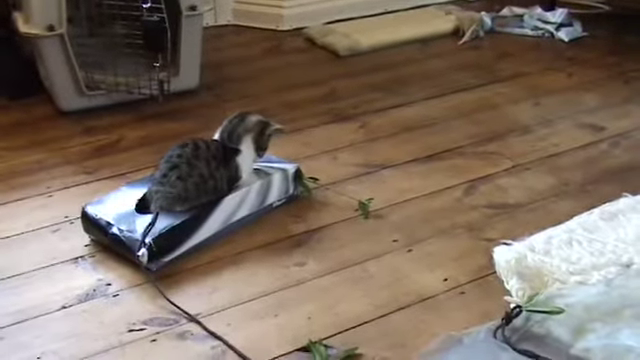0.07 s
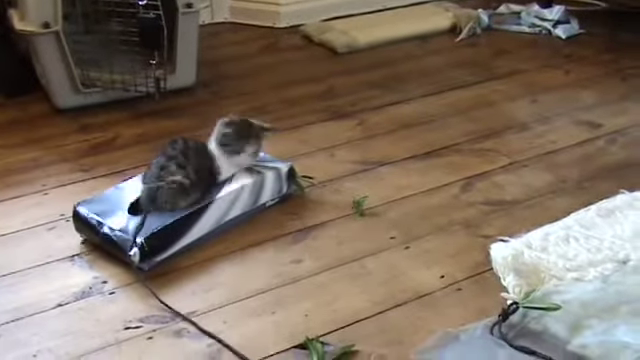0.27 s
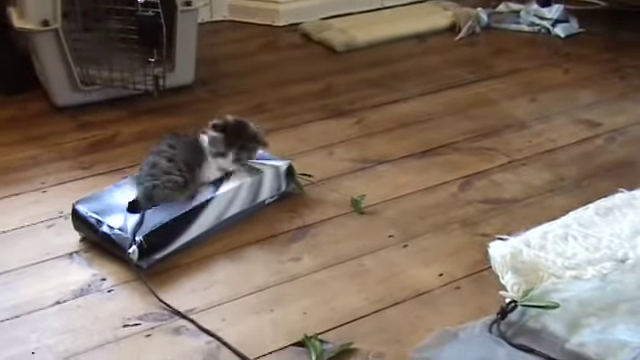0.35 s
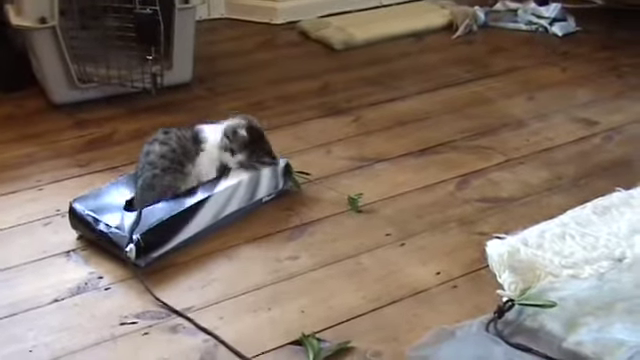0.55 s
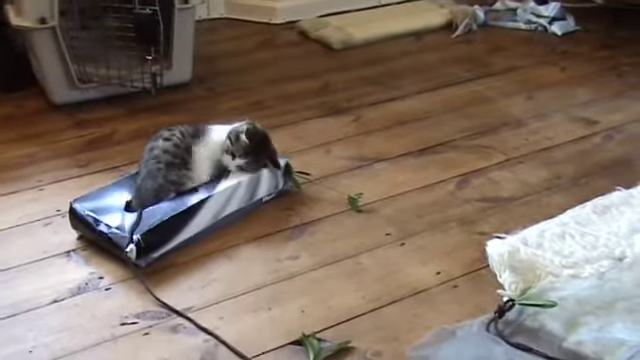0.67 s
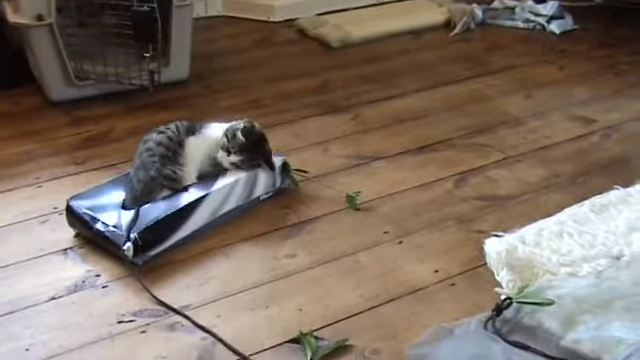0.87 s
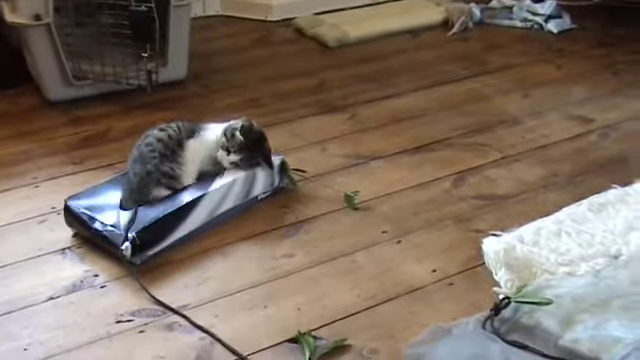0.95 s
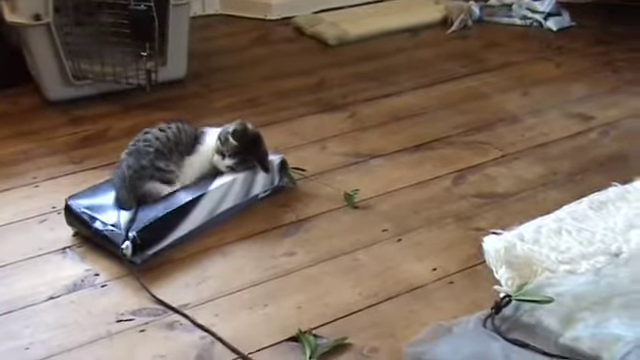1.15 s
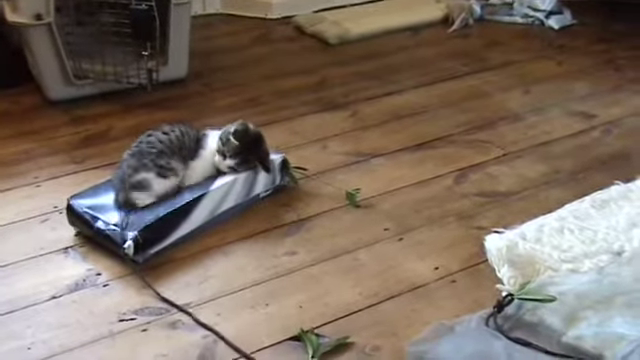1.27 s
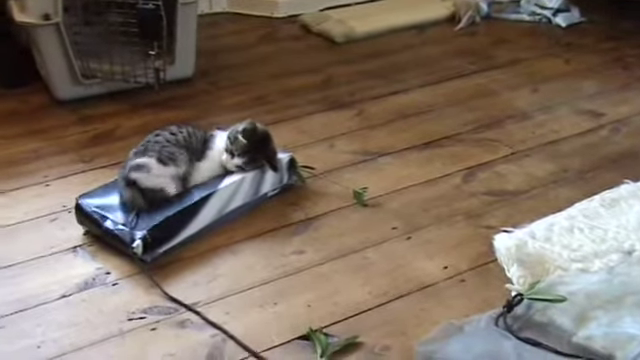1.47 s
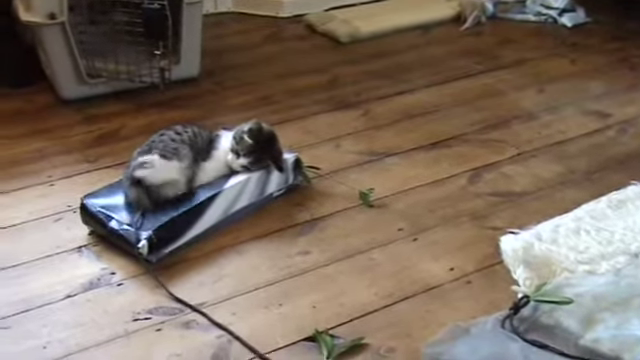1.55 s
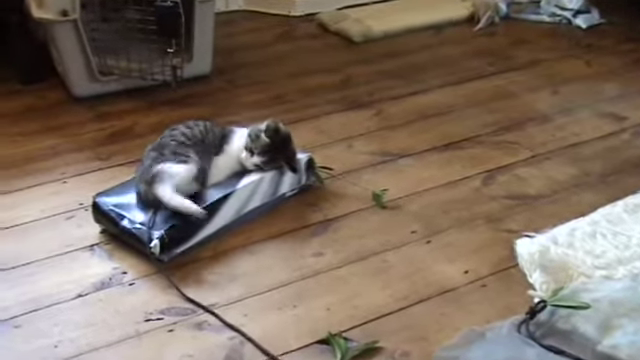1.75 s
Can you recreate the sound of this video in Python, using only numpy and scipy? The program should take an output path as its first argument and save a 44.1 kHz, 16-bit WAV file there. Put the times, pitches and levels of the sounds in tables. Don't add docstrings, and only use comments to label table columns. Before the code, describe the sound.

A hollow paper-wrapped box knocks on a wooden floor under a kitten. Faint rubbing from 0.1 seconds leads to a loud low thump cluster at 0.24-0.3 with paper crackle, then knocks at 0.33 and 0.44. A firm lid knock follows at 0.84, a bright sharp snap at 0.93, smaller taps at 1.1 and 1.28, near quiet, then faint rustling around 1.7. Bare room echo, soft hiss.

```python
import sys
import numpy as np
from scipy import signal
from scipy.io import wavfile

SR = 44100
rng = np.random.default_rng(int(sys.argv[2]) if len(sys.argv) > 2 else 0)


def elevation(decibels):
    levels = np.asarray(decibels, float)
    return 10 ** (levels / 20)


def generate_wav(signal):
    frames = np.transpose(np.atleast_2d(signal))
    scaled = np.clip(frames, -1, 1) * 32767
    pcm = np.round(scaled).astype(np.int16)
    wavfile.write(sys.argv[1], SR, pcm)


N = 79380


def evened(x):
    return x / np.sqrt(np.mean(x ** 2) + 1e-20)


def read(points, hz):
    f, value = np.transpose(points)
    return np.interp(np.log(hz + 1), np.log(f + 1), value)


def colour(x, points):
    log_gain = np.log(elevation(read(points, abs(np.fft.fftfreq(4096, 1 / SR)))))
    taps = np.fft.ifft(np.exp(signal.hilbert(log_gain).conj())).real[:2048]
    taps = taps.reshape((1,) * (x.ndim - 1) + (-1,))
    return signal.oaconvolve(x, taps, axes=-1)[..., :N]


def ring(modes, spot_db=0, shift=1):
    t = np.arange(SR // 4)[:, None] / SR
    hz, db, t60 = np.transpose(modes)
    decay = elevation(db + spot_db - 60 * t / t60)
    h = (decay * np.sin(2 * np.pi * hz * shift * t)).sum(1)
    return h / np.linalg.norm(h)


# frequency in Hz, level in dB.
AIR = [(12, -70), (20, -14), (197, -8.5), (226, -1.5), (283, -26), (363, -5), (886, -15), (1240, -15),
       (15600, -36)]
# frequency in Hz, likeness from -1 to 1.
AIR_SAME = [(60, -0.61), (240, -0.67), (950, -0.48), (3770, -0.4), (15000, 0.34)]


def air():
    frames, hz = N // 256 + 5, np.fft.rfftfreq(1024, 1 / SR)
    a, b, c, d = rng.standard_normal((frames, 513, 4)).T
    same = np.clip(read(AIR_SAME, hz), -1, 1)[:, None]
    left = a + 1j * b
    right = same * left + np.sqrt(1 - same ** 2) * (c + 1j * d)
    spectrum = np.array([left, right]) * elevation(read(AIR, hz))[:, None]
    hiss = signal.istft(spectrum, nperseg=1024, noverlap=768)[1][:, :N]
    return elevation(-52.5) * evened(hiss)


# start in seconds, length in seconds, paper level in dB, weight on the box in dB.
STROKES = [(0.102, 0.15, -55, -51), (0.156, 0.1, -35, -45.5), (0.209, 0.031, -27.5, -24.5),
           (0.26, 0.015, -28, -22.5), (0.303, 0.061, -57, -37.5), (0.349, 0.044, -37, -32.5),
           (0.429, 0.039, -47, -32.5), (0.459, 0.13, -50.5, -50.5), (0.546, 0.16, -42, -44.5),
           (0.667, 0.082, -49, -52.5), (0.714, 0.097, -45.5, -47), (0.76, 0.1, -56.5, -51),
           (0.874, 0.051, -40.5, -43), (0.956, 0.12, -44.5, -44), (1.101, 0.11, -47, -39),
           (1.168, 0.089, -42.5, -43.5), (1.222, 0.079, -42.5, -49), (1.295, 0.054, -67, -40.5),
           (1.645, 0.053, -57.5, -57), (1.686, 0.035, -48, -47.5), (1.71, 0.098, -58.5, -62)]
# frequency in Hz, level in dB.
PAPER = [(500, -8.5), (1000, -18.5), (2500, -6.5), (4700, -9), (7000, -17.5), (9000, -14.5), (12000, -13),
         (15500, -55)]
# frequency in Hz, width in Hz, level in dB.
CREASES = [(2240, 310, 3), (3320, 320, 0.5), (5300, 170, 1), (6860, 1470, 18)]
# frequency in Hz, level in dB.
THUD = [(60, -24.5), (120, 0), (350, 3.5), (700, 3), (1500, -7), (3000, -27.5)]
# frequency in Hz, level in dB, t60 in seconds.
LID = [(161.5, -7, 0.33), (337.6, -3.5, 0.35), (443.6, -30, 0.72), (470, -1, 0.35), (535, -6, 0.15),
       (581.2, 5.5, 0.076), (670.8, -0.5, 0.24), (783, -11, 0.37), (980, -12, 0.39), (1000, -4, 0.11),
       (1254, -4, 0.071), (1352, 7, 0.069), (1690, -7.5, 0.18), (2585, 5.5, 0.02)]


def rubbing():
    slips_per_s, spread_db, rise_shape = 3800, 4, 0.73
    t, paper, weight = np.arange(N) / SR, np.zeros(N), np.zeros(N)
    for start, length, paper_db, box_db in STROKES:
        progress = np.clip((t - start) / length, 0, 1)
        arch = np.sin(np.pi * progress ** rise_shape) ** 2
        paper += elevation(paper_db) * arch
        weight += elevation(box_db) * arch
    hit, sign, size = rng.random((3, 2, N))
    slips = (hit < slips_per_s / SR) * np.sign(sign - .5)
    slips = slips * elevation(-spread_db * np.log(size + 0.0035))
    fine, coarse = evened(slips[0]), evened(slips[1])

    sheet = fine
    for hz, width, db in CREASES:
        crease = ring([(hz, 0, 2.2 / width)])
        sheet = sheet + signal.oaconvolve(fine, elevation(db) * crease)[:N]
    sheet = evened(colour(sheet, PAPER))

    lid = signal.oaconvolve(weight * coarse, ring(LID))[:N]
    body = colour(weight * coarse, THUD) / np.std(colour(coarse, THUD))
    return paper * sheet + elevation(-2.5) * lid + body


def contacts(rows, modes, crack_db, bounce_db, detune=0.012):
    spot_db, crack_s, soft_start, rebound = 1.5, 0.0015, 0.041, 0.62
    ring_in_room, bounce_samples = 0.38, 77
    direct, far = np.zeros(N), np.zeros((3, N))
    t, grit = np.arange(N) / SR, rng.standard_normal(N)
    spots, bends = rng.standard_normal((2, len(rows), len(modes)))
    for k, (s, db, hz, ring_db, room_db) in enumerate(rows):
        at = int(s * SR)
        age = np.maximum(t[at:at + 1024] - s, 0)
        u = age * hz
        push = np.sin(2 * np.pi * u ** rebound) * np.exp(-((u - .4) / 0.48) ** 2)
        push = push * (1 - np.exp(-(u / soft_start) ** 2))
        r = np.exp(-2 * np.pi * 2.68 * hz / SR)
        crack = evened(signal.lfilter([1], [1, -2 * r, r * r], grit[at:at + 1024]))
        crack = crack * np.exp(-age / crack_s) * np.minimum(4 * u, 1)
        blow = push + elevation(crack_db) * crack

        first_push = push * (u ** rebound < .5)
        rung = signal.oaconvolve(first_push, ring(modes, spot_db * spots[k], 1 + detune * bends[k]))
        rung = (elevation(ring_db) * rung / abs(rung).max())[:N - at]
        n = len(rung)
        blow = np.pad(blow, (0, n))[:n]
        both = elevation(db) * (blow + rung)
        bounce = np.pad(both, (bounce_samples, 0))[:n]
        direct[at:at + n] += both + elevation(bounce_db) * bounce
        far[k % 3, at:at + n] += elevation(db + room_db) * (blow + ring_in_room * rung)
    return np.vstack([direct, far])


# start in seconds, peak in dB, contact
# frequency in Hz, ring in dB, room in dB.
SNAPS = [(.1735, -35, 3070, -34, 9), (0.2576, -10.5, 2230, -19, 5.5), (.2770, -9.5, 2450, -14, -17.5),
         (0.311, -15, 1970, -24, -7), (0.8403, -24.5, 2250, -15, 3), (1.1046, -22.5, 2500, -9, 1),
         (1.1415, -24.5, 2500, -22, 5), (0.9344, -2.5, 3890, -12, -0.5), (1.2865, -16.5, 4280, -17.5, -2.5),
         (1.2863, -22, 2580, -11, 1.5), (1.6966, -32.5, 4530, -21, 1), (1.7215, -31, 5550, -34, 1),
         (.172, -29, 4000, -15, -3), (0.181, -40, 5500, -18, 0), (.212, -35, 2400, -9, -2),
            (0.221, -28, 6000, -15, 5), (.2260, -17, 4800, -12, 1), (.2320, -19, 2510, -19, 3),
            (0.265, -16, 2830, -30, 3), (.2700, -21, 5540, -20, 4), (.2860, -32, 2290, -13, 0),
            (0.301, -28, 2580, -29, 1), (.3680, -21.5, 2530, -20, 4), (.3860, -29, 2200, -16, -6)]
# frequency in Hz, level in dB, t60 in seconds.
WRAP = [(162.6, -10, 0.47), (559, 4, 0.17), (657, -1, 0.31), (768, -15, 0.11), (1218, 6.5, 0.21),
        (1106, -2, 0.085), (1877, 3, 0.22), (1950, 4.5, 0.14), (2523, 2, 0.14), (3010, -1, 0.21),
        (3720, -0.5, 0.25), (4410, 0, 0.17), (4680, -3.5, 0.29), (5600, 4, 0.12)]


def paper_snaps():
    return contacts(SNAPS, WRAP, crack_db=-13.5, bounce_db=-22)


# start in seconds, peak in dB, contact frequency in Hz, ring in dB, room in dB.
KNOCKS = [(.1870, -38, 477, -5, 18), (.2120, -20.5, 493, -3, -24), (0.329, -9.5, 1328, -6, -2),
          (.4362, -19.5, 1370, -11, -0.5), (.5790, -27, 654, -15, 2.5), (.7380, -28, 520, -4, -7),
          (0.8413, -8.5, 743, -5.5, -1), (0.9344, -21.5, 1260, -5.5, 2), (.9435, -15.5, 1230, -18, 0.5),
          (1.1047, -16, 704, -7.5, 0.5), (1.1400, -23, 1000, 2, -19), (1.2788, -19.5, 565, -2.5, 5),
          (1.2820, -29.5, 470, 4, 2.5), (1.7400, -41, 1160, 3.5, -6)]


def lid_knocks():
    return contacts(KNOCKS, LID, crack_db=-10.5, bounce_db=-10)


# start in seconds, peak in dB, contact frequency in Hz, ring in dB, room in dB.
THUMPS = [(.2420, 1, 424, -11.5, -8), (0.2472, -5.5, 335, 2, -12), (0.2588, -9, 400, -11.5, -10),
          (.2680, -18, 420, 6.5, -15), (.2800, -15, 445, 0.5, -10), (0.2926, -22.5, 380, 7, -20),
          (0.3006, -16.5, 380, 9, 4), (0.347, -19, 590, -8, 1.5), (.3560, -21, 412, 2, -1),
          (.3980, -29, 380, 5.5, 0.5), (1.7150, -31, 383, -18, 4.5), (1.725, -33, 230, -13, 6)]
# frequency in Hz, level in dB, t60 in seconds.
BOX = [(84, -26, 0.21), (149.8, 3.5, 0.26), (247, 11, 0.11), (373, 16, 0.1), (368, 21.5, 0.23),
       (410, 16, 0.19), (544, 15, 0.059), (616, 11, 0.053), (910, 11.5, .15)]


def box_thumps():
    return contacts(THUMPS, BOX, crack_db=-10.5, bounce_db=-11, detune=0)


# frequency in Hz, t60 in seconds.
ROOM = [(80, 0.26), (300, 0.25), (1000, 0.55), (3000, 0.48), (7000, 0.39), (14000, 0.36)]
# frequency in Hz, level in dB.
ROOM_SIDE = [(40, -11), (150, -18), (600, -15.5), (1500, -9), (3000, -11.5), (6000, -4.5), (10000, 0),
             (13000, -22)]


def room(x):
    early_db, early_s = 4, 0.0053
    taps = np.zeros((2, SR))
    at = np.arange(140, SR - 20, 20) + rng.integers(0, 20, (2, (SR - 141) // 20))
    np.put_along_axis(taps, at, rng.choice([-1., 1.], at.shape), 1)
    hz, t, z = signal.stft(taps, SR, nperseg=256)
    decay = elevation(-60 * t / read(ROOM, hz)[:, None])
    tail = signal.istft(z * decay, SR, nperseg=256)[1]
    tail = tail * (1 + elevation(early_db) * np.exp(-np.arange(tail.shape[1]) / SR / early_s))
    tail = tail / np.linalg.norm(tail[0])
    mid, side = signal.fftconvolve(x[None], tail, axes=1)[:, :N]
    side = colour(side, ROOM_SIDE)
    return np.array([mid + side, mid - side])


# frequency in Hz, level in dB.
CONTACT_TONE = [(25, -25), (100, -12), (200, -1), (7300, 0.5), (8600, -8), (11000, -8), (15500, -33)]


def scene():
    rub = rubbing()
    struck = colour(paper_snaps() + lid_knocks() + box_thumps(), CONTACT_TONE)
    direct, far = struck[0], struck[1:]
    near = (elevation(-4.5) * rub + direct) * elevation(np.array([[-.3], [.3]]))
    echoes = sum(room(x) for x in far) + room(elevation(-2.5) * rub)
    return near + echoes + air()


def low_pass(x):
    return signal.sosfilt(signal.butter(12, 15800, fs=SR, output="sos"), x)


# frequency in Hz, level in dB.
TOP = [(9000, 1), (12000, -2), (15500, -6.5)]


def record(dry):
    ceiling = 1.4
    held = ceiling * np.tanh(colour(dry, TOP) / ceiling)
    heard = signal.oaconvolve(held, signal.firwin(255, 15750, fs=SR)[None], "same")
    return low_pass(heard)


dry = scene()
out = record(dry)
generate_wav(out)
```